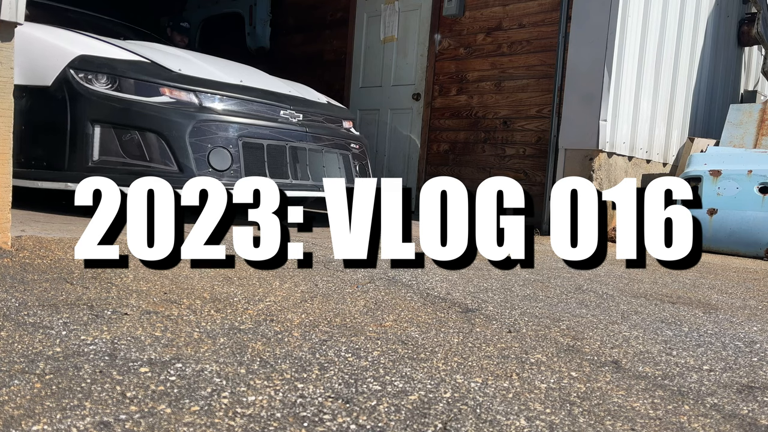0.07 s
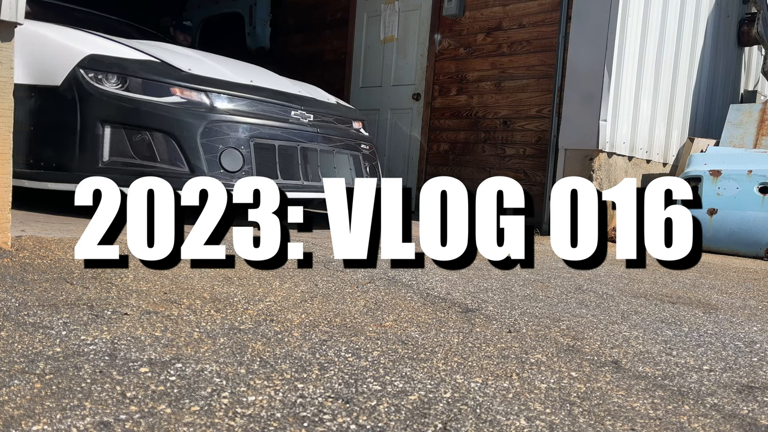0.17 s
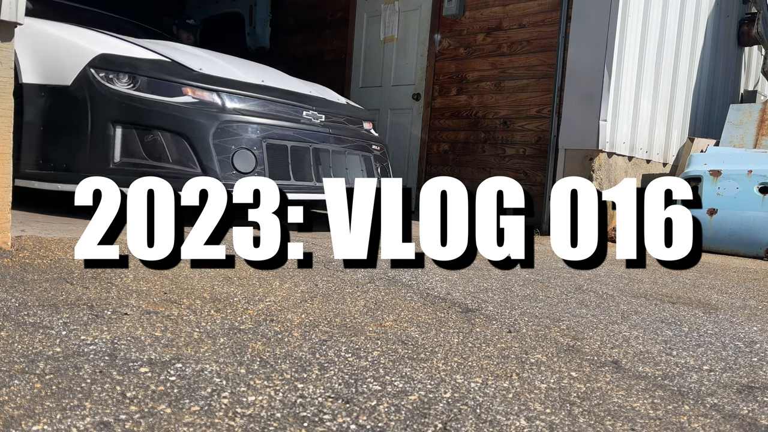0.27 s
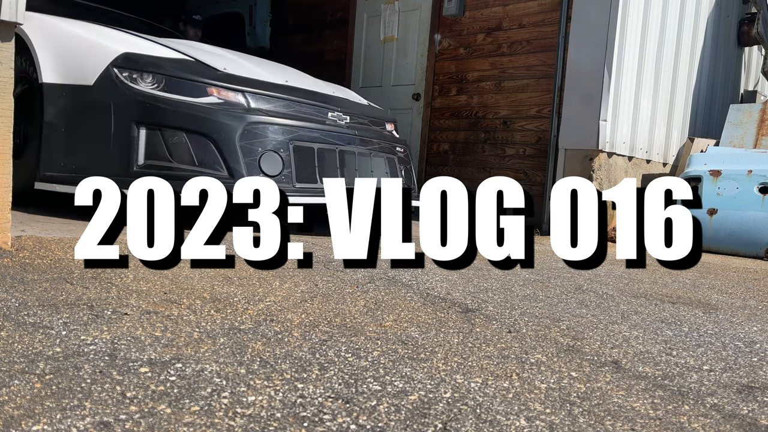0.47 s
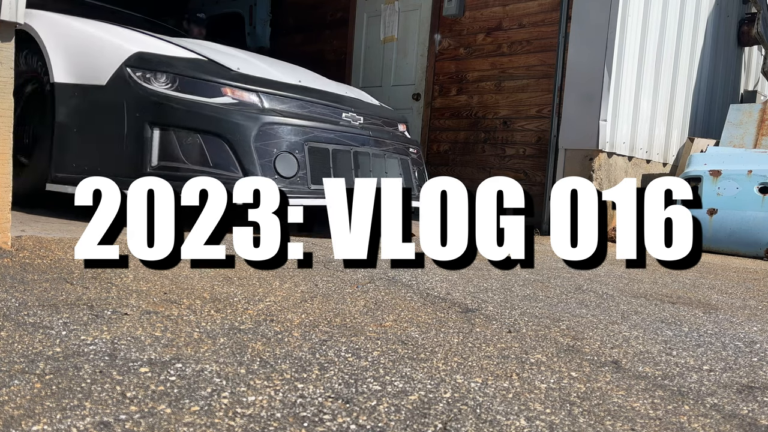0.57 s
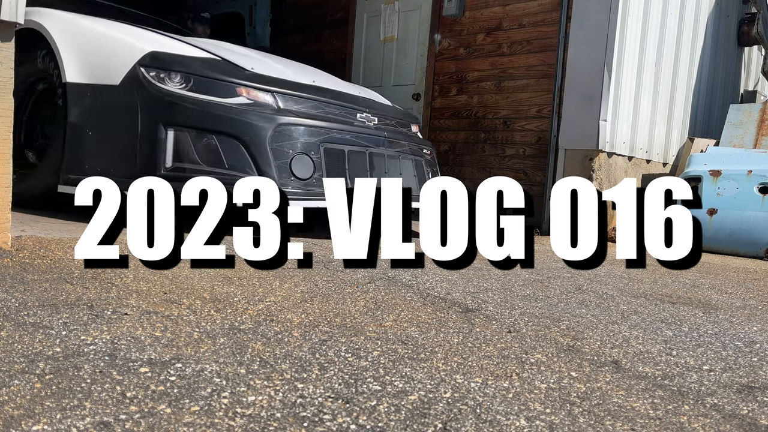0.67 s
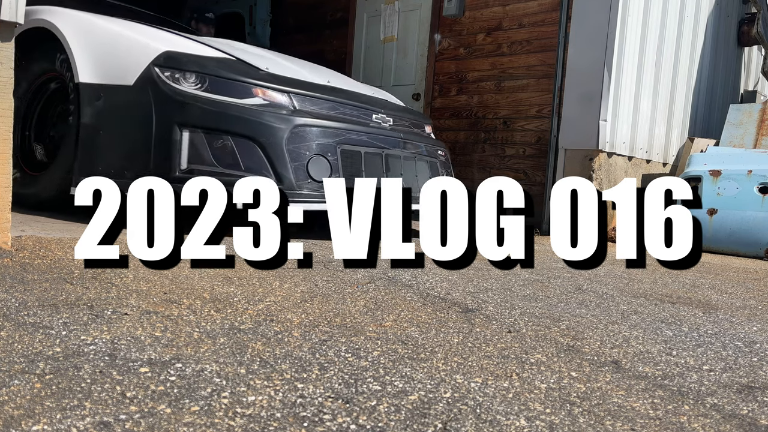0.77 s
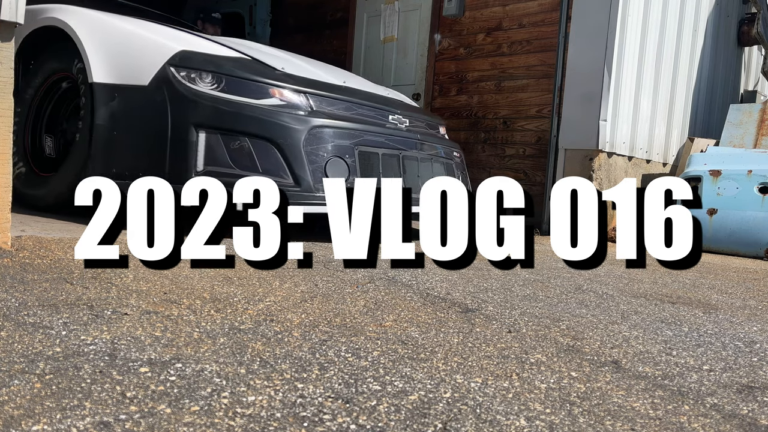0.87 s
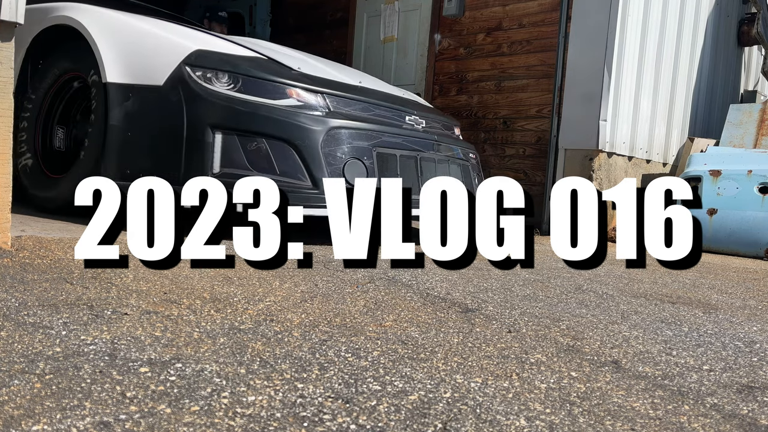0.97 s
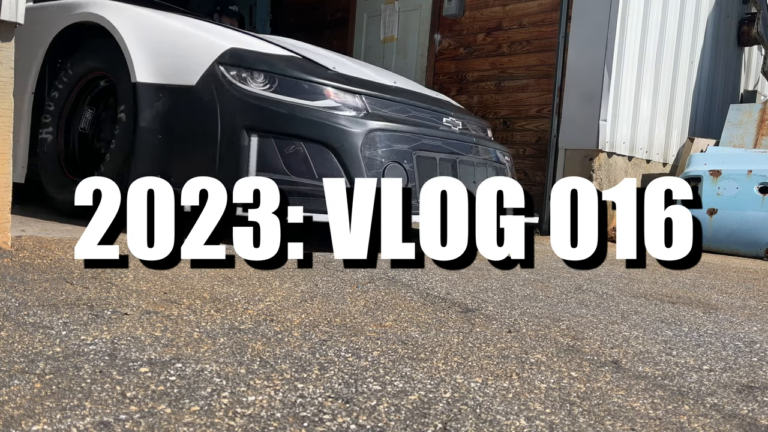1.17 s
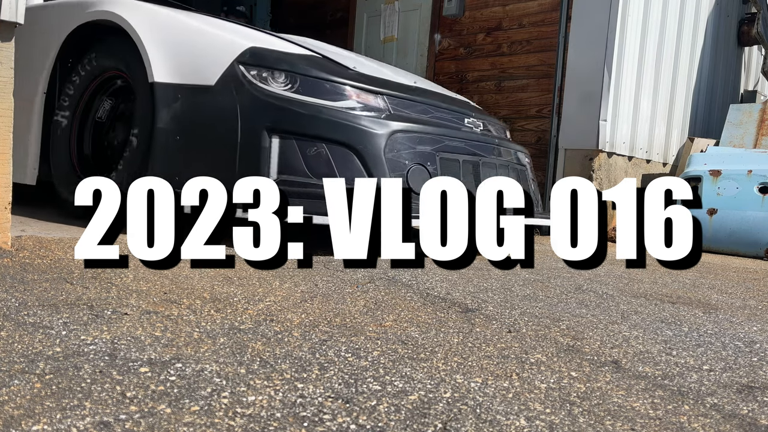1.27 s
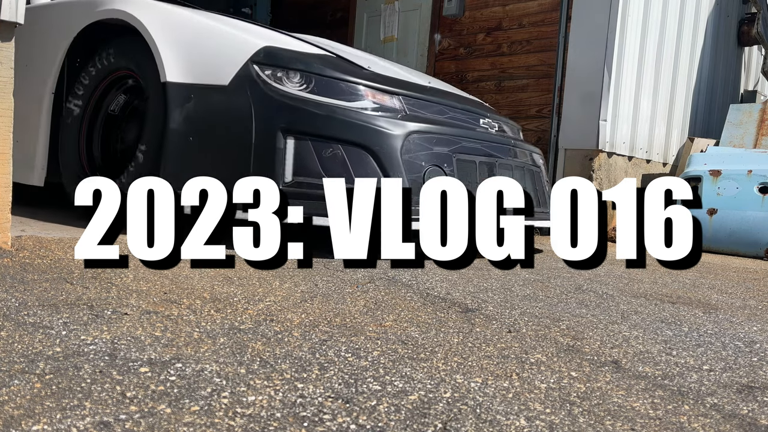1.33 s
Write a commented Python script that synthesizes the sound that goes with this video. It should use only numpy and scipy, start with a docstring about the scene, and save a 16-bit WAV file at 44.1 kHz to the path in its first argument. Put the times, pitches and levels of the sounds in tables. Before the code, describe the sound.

A car's tyres rumble softly across rough asphalt outdoors, with no engine running. Midway a small stone pings off the bodywork, and the crunching and popping of grit grows louder as a wheel nears the microphone.

```python
"""A low rumble and drumming of tyres comes first: a racing car rolls slowly, engine off, over gritty
asphalt towards a low pair of microphones. The rough surface shakes the tyres and bumps thump them.
Grit crunches and sand hisses under the tread, rubber scuffs, single stones crack, and one is squeezed
out and knocks against the car. It all grows as the front wheel comes near."""
import sys
import numpy as np
from scipy import signal
from scipy.fft import rfft, irfft
from scipy.io import wavfile
from scipy.ndimage import uniform_filter1d

SR = 44100
rng = np.random.default_rng(int(sys.argv[2]) if len(sys.argv) > 2 else 0)


def store_pcm(level_fs):
    """Save levels as 16-bit WAV."""
    pcm = np.round(np.clip(level_fs, -1, 1) * 32767).astype(np.int16)
    wavfile.write(sys.argv[1], SR, np.atleast_2d(pcm).T)


N = 107515
TIME = np.arange(N) / SR
FREQS = np.maximum(np.fft.rfftfreq(N, 1 / SR), 1)

# Fader rides, ahead of each layer's trim: t/s, level/dB
RUMBLE_RIDE = [(.08, -65), (.16, -51.5), (.22, -55), (.45, -55.5), (.58, -53), (.65, -51), (.72, -47),
               (.96, -51.5), (1.04, -45), (1.15, -55), (1.28, -43), (1.36, -49), (1.52, -49.5), (1.78, -42),
               (1.87, -37), (1.97, -31), (2.06, -39.5), (2.32, -39), (2.40, -33), (2.44, -45)]  # deep tyre rumble
DRUM_RIDE = [(.08, -55), (.33, -53), (.48, -44), (.55, -49), (.62, -45.5), (.74, -48), (.85, -42),
             (.97, -45), (1.05, -38.5), (1.2, -43), (1.5, -45), (1.58, -41), (1.8, -43), (1.98, -37.5),
             (2.1, -40), (2.32, -42.5), (2.44, -43)]  # casing and body panels
CRUNCH_RIDE = [(.07, -61.5), (.5, -60), (.65, -57.5), (.8, -59.5), (.97, -50.5), (1.18, -58.5),
               (1.28, -50.5), (1.45, -53.5), (1.7, -52), (1.8, -50), (1.88, -39.5), (1.97, -46),
               (2.05, -47), (2.2, -41), (2.26, -45.5), (2.33, -42.5), (2.44, -49.5)]  # grit being crushed
SAND_RIDE = [(.07, -66), (.22, -67.5), (.45, -71.5), (.6, -68.5), (.86, -68.5), (.92, -60), (1.03, -63.5),
             (1.08, -61.5), (1.2, -62.5), (1.31, -64), (1.39, -62.5), (1.45, -62.5), (1.69, -67.5),
             (1.8, -58), (1.9, -50), (2.05, -55.5), (2.34, -53), (2.44, -52.5)]  # fine sand under the tread
# Tone of the same four layers: f/Hz, relative level/dB
RUMBLE_EQ = [(20, -63), (31, 5.5), (42, -22), (52, 0), (61, 4), (74, -2), (88, 0), (110, -19.5), (170, -33),
             (400, -104)]
DRUM_EQ = [(50, -42), (95, 0.5), (130, 4.5), (160, -1.5), (240, -3), (310, -4), (390, -13), (520, -18.5),
           (1000, -32), (3000, -103)]
CRUNCH_EQ = [(200, -5), (480, 3.5), (700, 1), (1000, -3.5), (1450, -7), (1850, -10), (2700, -7.5),
             (3600, -13), (4600, -19), (6000, -22), (9000, -30.5), (16000, -33)]
SAND_EQ = [(1000, 1), (2500, -0.5), (4500, -4), (5600, -6.5), (7500, -2.5), (10000, -5.5), (13000, -7),
           (16000, -23)]
# A tyre thumps over a bump: t/s, level/dB, f/Hz
THUMP_CUES = [(.474, -46, 163), (0.606, -41, 231), (.625, -40, 82), (0.818, -44, 99), (1.003, -43, 175),
              (1.051, -35.5, 237), (1.272, -40.5, 71.3), (1.549, -48, 85), (1.677, -38, 162),
              (1.867, -35, 274), (1.935, -34.5, 86.5), (1.986, -38, 129), (2.005, -38.5, 152),
              (2.226, -34.5, 154), (2.368, -30.5, 219), (2.380, -36, 69.4)]
# Rubber scuffs on grit or sand: midpoint t/s, length/s, rub level/dB, f/Hz, hiss level/dB
SCUFF_CUES = [(0.307, 0.13, -59, 2440, -70), (0.316, .11, -60, 4400, -63),
              (0.964, 0.033, -58.5, 3700, -71.5), (1.097, .11, -68, 12500, -80),
              (1.383, 0.065, -58, 1610, -82), (1.39, .11, -64.5, 12600, -81),
              (1.493, 0.058, -57, 4200, -62)]
# Resonances of the wheel and its arch: f/Hz, width/Hz, level/dB
ARCH_MODES = [(513, 16, -9), (790, 7.3, -29), (1210, 11, -5), (1752, 40, 0), (1888, 9.6, 4.5),
              (2270, 13, -9), (2680, 16, -1.5), (2940, 20, -11)]
# A squeezed-out stone hits the car: t/s, level/dB, tick level/dB
KNOCK_CUES = [(1.2335, -14.5, -66), (1.2362, -12, -41), (1.2395, 0, -31), (1.2444, -1.5, -27.5)]
# Ring of the struck panel: f/Hz, level/dB, t60/s
PANEL_MODES = [(620, -39.5, 0.04), (815, -36, 0.068), (1041, -36.5, 0.059), (1250, -43.5, 0.081),
               (1696, -45, 0.066), (1843, -49, .04), (2068, -41.5, .037), (2220, -50, .04),
               (2620, -52, .03), (4260, -39, 0.014), (4510, -33.5, 0.011), (5840, -39.5, 0.0086)]
# Stones crack under the tread: t/s, pop level/dB, f/Hz, Q, tick level/dB
CRACK_CUES = [(.412, -44, 3670, 0.99, -72), (0.6523, -38, 920, 2.1, -74), (.7722, -50, 6500, 1, -58),
              (0.9922, -43, 3800, .8, -53), (1.0716, -42.5, 3200, 0.7, -54), (1.5331, -42, 2200, 0.97, -52),
              (1.5803, -39, 3800, 0.42, -52), (1.7297, -43.5, 3400, 0.58, -50),
              (1.7398, -43.5, 4200, 0.7, -52), (1.7677, -39, 2780, 1.4, -47),
              (1.8425, -29, 1900, 0.87, -46), (1.8681, -35, 1500, 0.72, -34.5), (1.9035, -26, 1250, 1, -38),
              (1.907, -32, 2090, 1.5, -38), (1.9234, -23, 2270, 0.65, -24),
              (1.9262, -31.5, 2600, 0.35, -36), (1.957, -38, 2250, 2.5, -53),
              (2.0674, -33.5, 2310, 1.2, -53), (2.0886, -31.5, 2040, 1.1, -48),
              (2.0956, -33.5, 2600, 1.1, -43), (2.1392, -35.5, 2210, 1, -52), (2.1755, -41, 2600, .9, -48),
              (2.1941, -20.5, 910, 1.56, -55), (2.2073, -37, 2200, 0.71, -36.5),
              (2.2989, -32, 2500, 1.2, -54), (2.304, -30, 2050, 0.87, -51),
              (2.3498, -33.5, 2190, 0.89, -42)]
# How alike left and right are: f/Hz, likeness from 0 to 1
STEREO_LIKENESS = [(60, .975), (300, .95), (700, .78), (1400, .62), (1900, .88), (3500, .7), (5500, .75),
                   (8200, .95), (10000, .78), (12000, .87), (15000, .78)]
# Phase of left against right, which places the sound off-centre and widens it: f/Hz, phase/rad
STEREO_PHASE = [(20, 0), (300, .15), (1300, .6), (1900, .25), (3300, 1.4), (4700, .3), (6400, -1.0),
                (7700, -2.9), (8800, -3.3), (11200, -6.0), (12900, -6.5), (14800, -9.2)]
# Level of left against right: f/Hz, level/dB
STEREO_BALANCE = [(100, 0), (300, -.4), (600, 1.5), (1100, 2), (1800, .5), (3000, 1.8), (4200, 3),
                  (6000, 2), (8000, .7), (15000, .7)]

RUMBLE_TRIM_DB, DRUM_TRIM_DB, CAVITY_TRIM_DB, THUMP_TRIM_DB = 0, -2, -6, 2.5
CRUNCH_TRIM_DB, SAND_TRIM_DB, POP_TRIM_DB, TICK_TRIM_DB = -0.78, 1.27, 1.5, 8
GRAINY_FAR, GRAINY_NEAR, NEAR_DB = 0.42, 0.84, -46.5  # grains' share of the crunch tops out at NEAR_DB
SNAP_AT_S, SNAP_SHARE = 0.004, 0.5
CRACK_RISE_S = 0.00065  # a brief noise fade-in softens each crack's attack


def from_db(db):
    """Decibels to gain."""
    return 10 ** (np.asarray(db) / 20)


def rms_one(x):
    """Scale to rms 1."""
    return x / np.sqrt(np.mean(x ** 2) + 1e-20)


def fader(ride):
    """Gain over time from t/s, level/dB points."""
    return from_db(np.interp(TIME, *np.transpose(ride)))


def across_hz(points):
    """Draw a curve through f/Hz, value points on a log frequency axis."""
    hz, value = np.transpose(points)
    return np.interp(np.log(FREQS), np.log(hz), value)


def equalise(x, eq):
    """Shape a signal with an EQ curve; rms 1."""
    return rms_one(irfft(rfft(x) * from_db(across_hz(eq)), N))


def resonate(x, hz, width_hz):
    """One resonance, unity gain at its peak."""
    r = np.exp(-np.pi * width_hz / SR)
    feedback = [1, -2 * r * np.cos(2 * np.pi * hz / SR), r * r]
    return signal.lfilter(np.array([1, 0, -1]) * (1 - r * r) / 2, feedback, x + 1e-18)


def band(x, hz, q):
    """Two equal resonances in series; rms 1."""
    return rms_one(resonate(resonate(x, hz, hz / q), hz, hz / q))


def spread(pair):
    """Mid and side become a partly alike left and right."""
    alike = np.clip(across_hz(STEREO_LIKENESS), 0, .999)
    mid, side = rfft(pair)
    return irfft(np.sqrt((1 + alike) / 2) * mid + np.sqrt((1 - alike) / 2) * side * [[1], [-1]], N)


def steady(x, window_s):
    """Hold the slow level of a noise at 1."""
    return x / np.sqrt(uniform_filter1d(np.mean(x ** 2, axis=0), int(window_s * SR)) + 1e-12)


def add(track, s, x):
    """Mix a short sound in at time s."""
    start = int(s * SR)
    track[..., start:start + x.shape[-1]] += x[..., :N - start]


def yard(x, t60_s=0.14, send_db=-12.5, top_hz=3500):
    """Short dull reflections from the car and the walls, different on each side."""
    age = np.arange(SR // 3) / SR
    tail = rng.standard_normal((2, len(age))) * from_db(-60 * age / t60_s)
    tail = signal.sosfilt(signal.butter(2, top_hz, fs=SR, output="sos"), tail)
    tail /= np.sqrt(np.sum(tail ** 2) / 2)
    return from_db(send_db) * signal.fftconvolve(x, tail, axes=1)[:, :N]


def tyres():
    """The rough road shakes the tyres: deep rumble, drumming casing and the ring of the air inside."""
    road = rng.standard_normal((3, 2, N))
    rumble = steady(equalise(spread(road[0]), RUMBLE_EQ), window_s=0.087)
    casing = steady(equalise(spread(road[1]), DRUM_EQ), window_s=0.11)
    cavity = steady(resonate(spread(road[2]), hz=178.5, width_hz=7.4), window_s=0.12)
    drumming = from_db(DRUM_TRIM_DB) * casing + from_db(CAVITY_TRIM_DB) * cavity
    return from_db(RUMBLE_TRIM_DB) * fader(RUMBLE_RIDE) * rumble + fader(DRUM_RIDE) * drumming


def thumps(attack_cycles=0.83):
    """A bump pushes the soft tyre, which swings for a few cycles."""
    out, age = np.zeros(N), np.arange(SR // 5) / SR
    for s, db, hz in THUMP_CUES:
        rise = age * hz / attack_cycles
        envelope = rise * np.exp(1 - rise)
        add(out, s, from_db(db + THUMP_TRIM_DB) * envelope * np.sin(2 * np.pi * hz * age))
    return out


def scuffs():
    """Short swells of rubber sliding on the road, each with a broad hiss."""
    out = np.zeros((2, N))
    for s, length_s, rub_db, hz, hiss_db in SCUFF_CUES:
        swell = np.cos(np.pi * np.clip((TIME - s) / length_s, -.5, .5))
        rub = band(rng.standard_normal((2, N)), hz, q=2)
        hiss = equalise(rng.standard_normal((2, N)), SAND_EQ)
        out += swell * (from_db(rub_db) * rub + from_db(hiss_db) * hiss)
    return spread(out)


def wheel_arch(x):
    """The wheel and its arch add their ring to what sounds under the tyre."""
    return x + sum(from_db(db) * resonate(x, hz, width_hz) for hz, width_hz, db in ARCH_MODES)


def grains(per_s, decay_s, spread_db, kinds=12, size=1024):
    """A stereo cloud of tiny fractures of uneven strength, each a fast-dying noise burst."""
    strength = from_db(spread_db * np.minimum(rng.exponential(1, N), 5)) * rng.choice([-1, 1], N)
    clicks = strength * (rng.random(N) < per_s / SR)
    kind = rng.integers(0, kinds, N)
    bursts = rng.standard_normal((kinds, 2, size)) * np.exp(-np.arange(size) / SR / decay_s)
    cloud = sum(signal.oaconvolve([clicks * (kind == k)], bursts[k], axes=1) for k in range(kinds))
    return spread(cloud[:, :N])


def grit():
    """Grit crunches under the tread, a smooth rub from afar and grainier close by; fine sand hisses."""
    nearness = np.minimum(fader(CRUNCH_RIDE) / from_db(NEAR_DB), 1)
    grainy = GRAINY_FAR + (GRAINY_NEAR - GRAINY_FAR) * nearness
    rub = rms_one(spread(rng.standard_normal((2, N))))
    fractures = rms_one(grains(per_s=2000, decay_s=0.00066, spread_db=3.5))
    crunch = equalise(np.sqrt(1 - grainy) * rub + np.sqrt(grainy) * fractures, CRUNCH_EQ)
    crunch = rms_one(wheel_arch(crunch))
    sand = equalise(grains(per_s=9000, decay_s=0.00016, spread_db=0.5), SAND_EQ)
    return (from_db(CRUNCH_TRIM_DB) * fader(CRUNCH_RIDE) * crunch
            + from_db(SAND_TRIM_DB) * fader(SAND_RIDE) * sand)


def crack(hz, decay_s, q, size=1024):
    """One clean snap in a burst of noise, heard through a stone's broad resonance; mid and side."""
    age = (np.arange(size) - int(SNAP_AT_S * SR)) / SR
    envelope = np.exp(np.minimum(age / CRACK_RISE_S, -age / decay_s))
    burst = band(rng.standard_normal((2, size)) * envelope, hz, q)
    snap = band(1. * (age == 0), hz, q)
    share = SNAP_SHARE * np.array([[1], [0]])  # the snap sits in the mid only
    gain = np.sqrt(decay_s * SR / 2 / size) / 2  # a longer decay carries more energy
    return gain * (np.sqrt(share) * snap + np.sqrt(1 - share) * burst)


def tick():
    """The sharp, bright edge on a crack or knock."""
    return crack(hz=9000, decay_s=0.00052, q=0.73)


def flung_stone(thud_db=-27, click_db=-31.5):
    """A squeezed-out stone knocks several times in quick succession and sets a panel ringing."""
    out, age = np.zeros((2, N)), np.arange(SR // 4) / SR
    for s, db, tick_db in KNOCK_CUES:
        ring = np.zeros((2, len(age)))
        for hz, mode_db, t60_s in PANEL_MODES:
            polarity = rng.choice([-1, 1], (2, 1))
            ring += polarity * from_db(mode_db - 60 * age / t60_s) * np.sin(2 * np.pi * hz * age)
        thud = from_db(thud_db) * crack(hz=1110, decay_s=0.0024, q=0.85)
        click = from_db(click_db) * crack(hz=4600, decay_s=0.0016, q=0.95)
        add(out, s, from_db(db) * ring)
        add(out, s - SNAP_AT_S, from_db(db) * (thud + click) + from_db(tick_db) * tick())
    return spread(out)


def cracking_stones():
    """Larger stones crack under the tread, each with a pop at its own pitch and a sharp tick."""
    out = np.zeros((2, N))
    for s, pop_db, hz, q, tick_db in CRACK_CUES:
        pop = from_db(pop_db + POP_TRIM_DB) * crack(hz, decay_s=0.0016, q=q)
        add(out, s - SNAP_AT_S, pop + from_db(tick_db + TICK_TRIM_DB) * tick())
    return spread(out)


def scene():
    """A dry bed of tyres and grit, with the stone hits on top echoing in the yard."""
    hits = wheel_arch(cracking_stones()) + flung_stone()
    return tyres() + thumps() + grit() + scuffs() + hits + yard(hits)


def record(dry, start_s=0.072, low_cut_hz=41.4, high_cut_hz=15900):
    """The image is widened and set off-centre; the sound cuts in, with sub-bass and top cut off."""
    sides = np.array([[.5], [-.5]])
    image = np.exp(1j * sides * across_hz(STEREO_PHASE)) * from_db(sides * across_hz(STEREO_BALANCE))
    heard = irfft(rfft(dry) * image, N) * (TIME > start_s)
    heard = signal.sosfilt(signal.butter(3, low_cut_hz, "high", fs=SR, output="sos"), heard)
    return signal.sosfilt(signal.ellip(12, .1, 80, high_cut_hz, fs=SR, output="sos"), heard)


dry = scene()
out = record(dry)
store_pcm(out)
```